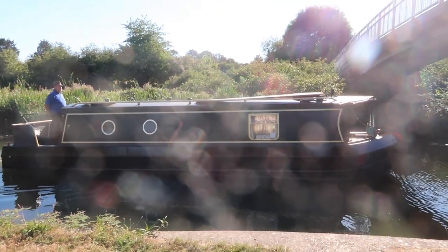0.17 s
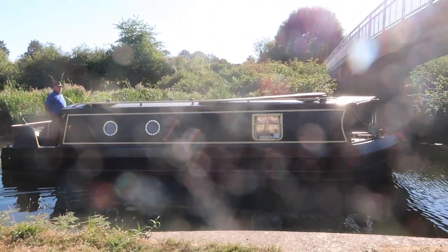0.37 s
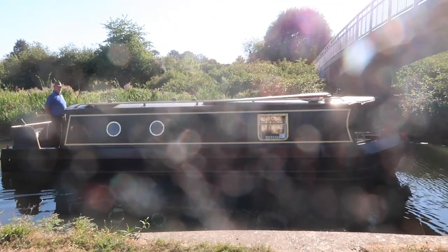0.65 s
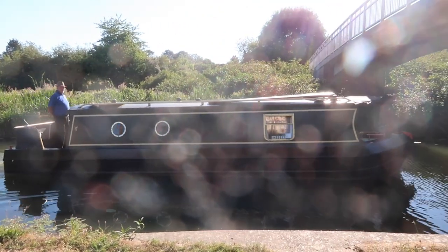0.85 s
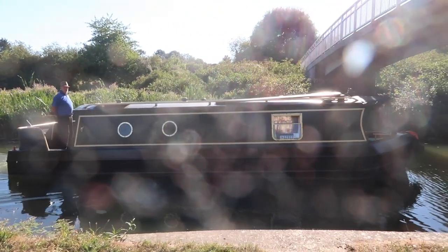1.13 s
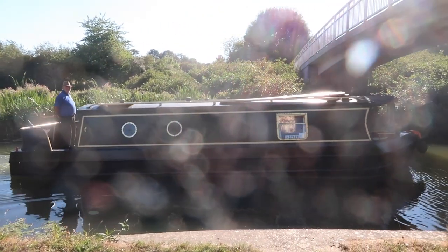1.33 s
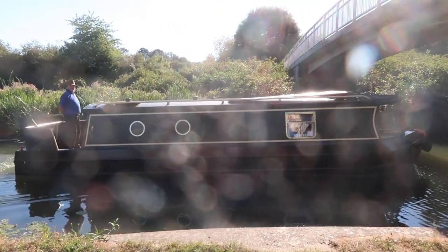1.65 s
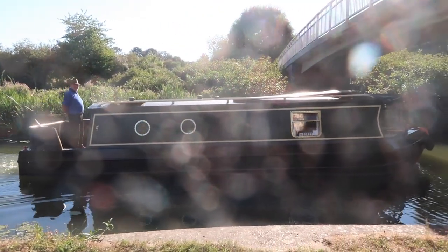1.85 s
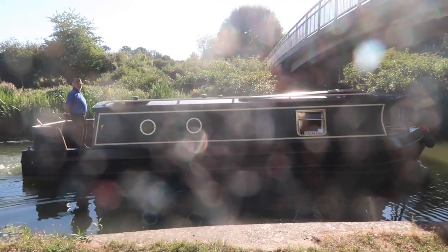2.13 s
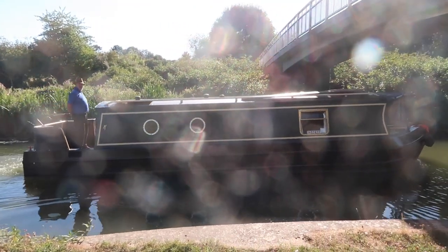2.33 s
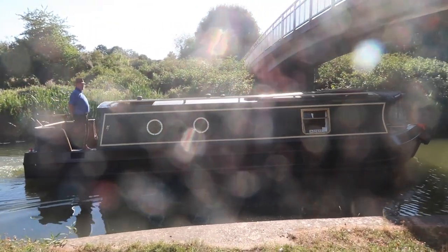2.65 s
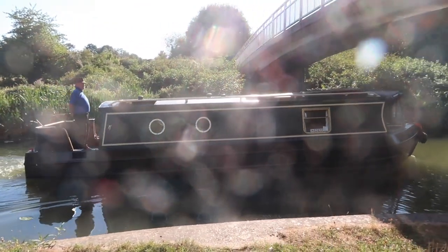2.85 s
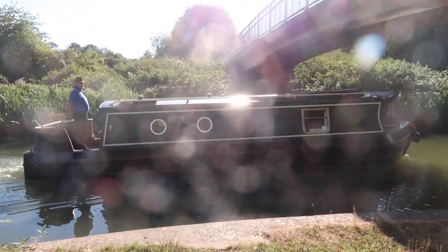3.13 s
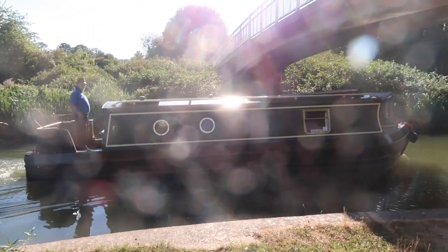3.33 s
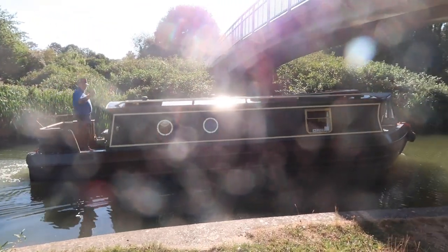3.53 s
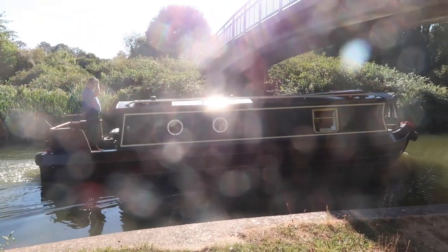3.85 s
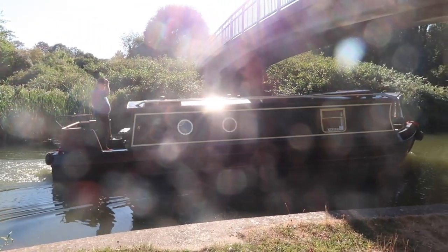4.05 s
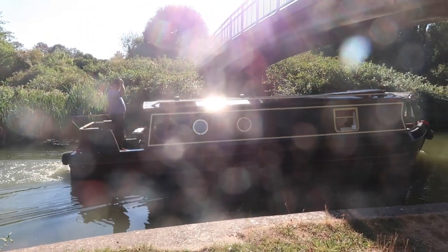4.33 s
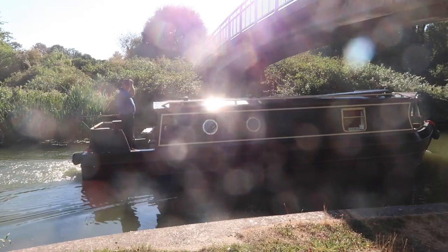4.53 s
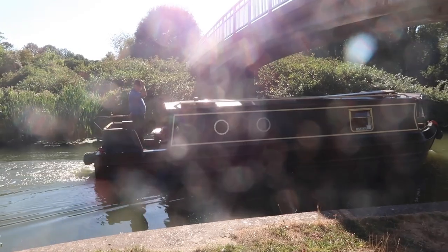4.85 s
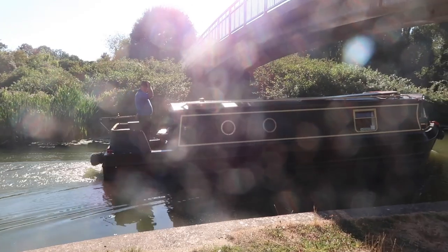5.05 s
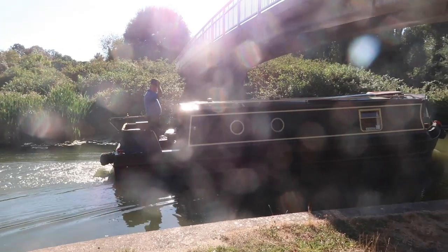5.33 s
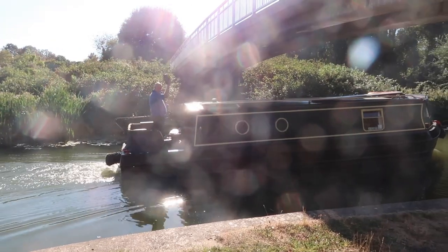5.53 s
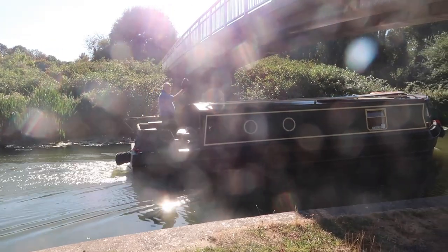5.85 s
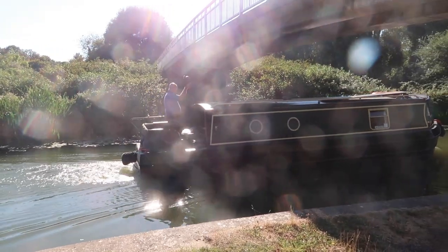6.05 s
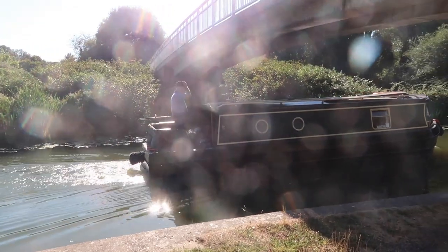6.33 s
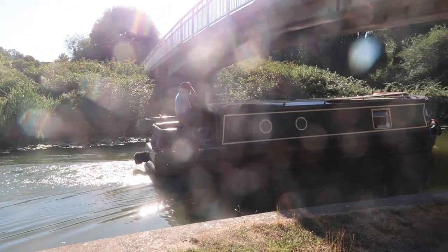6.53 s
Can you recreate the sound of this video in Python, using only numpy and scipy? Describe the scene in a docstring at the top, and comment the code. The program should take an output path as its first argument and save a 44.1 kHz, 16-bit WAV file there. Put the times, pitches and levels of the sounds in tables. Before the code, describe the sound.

A narrowboat's diesel engine chugs fast and evenly at close range, with metallic hull clatter and hissing, bubbling propeller wash growing clearer behind it.

```python
"""A narrowboat's slow four-cylinder diesel chugs past on a canal: uneven firings ring exhaust pipe and plates.
Valve gear, gears and bearings clatter through the hull, loose panels and parts answer once a cycle.
The propeller throbs low down; its wash hisses, bubbles and drips, with tappets ticking through it.
The governor hunts, and the tone changes as the boat goes from broadside to stern-on.
Behind it lie a little scatter from the banks and a faint thin whine."""
import sys
import numpy as np
from scipy import signal
from scipy.fft import rfft, irfft, next_fast_len
from scipy.io import wavfile
from scipy.ndimage import uniform_filter1d, map_coordinates

SR = 44100
rng = np.random.default_rng(int(sys.argv[2]) if len(sys.argv) > 2 else 0)


def to_wav(s):
    """Save 16-bit WAV."""
    ch = np.atleast_2d(s).T  # columns
    pcm = np.round(np.clip(ch, -1, 1) * 32767)  # PCM
    wavfile.write(sys.argv[1], SR, pcm.astype(np.int16))


N = 294588

FIRST = .621  # share of a cycle before the first cylinder fires
CYCLE_HZ, SAG_HZ_PER_S = 14.5124, .0086  # engine speed at the start without hunting, and its slow fall
HUNT_S, SURGE_AT_S = 3.245, .9975  # the governor's hunting: period, moment of the first surge
HUNT_HZ, PEAKED_HZ = .131, .028  # depth of the hunting; its second harmonic sharpens the surges
SURGE_DB = .5  # lift of clatter and wash at a surge, equal dip in a sag
TOP_HZ = 14950  # band limit of the microphone

# Exhaust pipe resonances: f/Hz, width/Hz, signed gain, then level/dB at eight moments of the swing
PIPE_MODES = [(58.15, 7.7, -0.93, -31.5, -31.5, -29.5, -30, -28.5, -29.5, -30, -30),
              (62.78, 25.1, 0.9, -28, -28.5, -29.5, -27.5, -27, -27.5, -27.5, -27.5),
              (88.84, 9.16, 0.75, -34, -28, -22.5, -22, -21, -23, -20, -19),
              (93, 22.9, -0.924, -26, -24, -23.5, -22, -22, -22, -20.5, -19.5),
              (112.42, 40.1, 0.94, -34.5, -33, -34.5, -34, -33, -33, -31, -29),
              (155.9, 35, -1.077, -42.5, -41.5, -42, -40, -40.5, -40, -38.5, -39.5),
              (201.6, 4.5, 0.66, -51.5, -39.5, -54, -47, -46, -39, -38.5, -43.5)]
# Hull plates shaken by the firings: f/Hz, width/Hz of each of two stages, signed gain,
# then level/dB at the same eight moments
PLATE_MODES = [(88, 5.5, 0.89, -32, -40, -53, -55, -60, -64, -59, -65),
               (130.1, 6.5, -0.58, -47.5, -50, -50, -49, -66, -56, -56, -55),
               (99.8, 6.5, -1.03, -55, -68, -56, -51, -38.5, -40, -58, -66),
               (99.1, 5.4, 1, -55, -46.5, -46, -60, -66, -69, -54, -41),
               (153.6, 7, 0.41, -52, -52, -56, -52, -47, -57, -46, -34.5),
               (203.2, 10, -0.83, -65, -52, -62, -52, -44, -52, -49, -45),
               (261.4, 8.6, 0.87, -65, -60, -59.5, -63.5, -59, -58.5, -48.5, -52),
               (348, 11, -0.78, -64, -75, -63, -68.5, -67, -68, -71, -79),
               (181.7, 10.1, 0.96, -61, -47.5, -44, -42.5, -63, -44, -57, -67),
               (189, 6, 1, -48, -49, -70, -50, -40, -62, -45, -44),
               (217.7, 6, -0.61, -59, -49, -43, -42.5, -47.5, -42.5, -45, -56),
               (249, 13.9, 0.96, -47.5, -48, -69, -46.5, -49.5, -51.5, -47, -50),
               (276.3, 14.2, -0.96, -58.5, -53.5, -52, -55, -59, -54.5, -67, -58.5),
               (304, 5.8, 0.86, -62, -65, -59.5, -50, -51, -61, -52.5, -63),
               (321.7, 14, -0.44, -64, -55.5, -64, -52, -50, -58, -54.5, -48),
               (364.6, 7.8, 0.87, -62.5, -67, -53.5, -60, -46.5, -50.5, -59, -68),
               (395, 8.3, -0.47, -56, -55, -58, -55, -43, -49, -55, -52),
               (424, 49, 0.74, -60.5, -65.5, -71, -67, -69, -67, -67, -60),
               (442, 27, -0.52, -60.5, -68.5, -57, -67, -58, -57.5, -65, -65),
               (482.5, 11.7, 1, -69, -51, -51, -55, -58.5, -53.5, -51, -65)]
# Spectrum of wash and tappets heard from the stern: f/Hz, relative level/dB per Hz
STERN_WASH = [(1500, -31), (3000, -4), (4300, -0.5), (5100, -3), (5400, 0.5), (5750, -5), (7000, -4.5),
              (7350, -6.5), (7570, -5), (7800, -9), (8500, -9.5), (8800, -8.5), (9300, -9), (11000, -19.5),
              (13300, -21.5), (14800, -36)]


def amp(db):
    """Decibels to linear gain."""
    return 10 ** (np.asarray(db) / 20)


def unit(x):
    """Scale to rms 1."""
    return x / np.sqrt(np.mean(x ** 2) + 1e-20)


def wobble(rate):
    """A smooth random curve, rate knots a second."""
    knots = rng.standard_normal(int(N * rate / SR) + 4)
    return map_coordinates(knots, [np.arange(N) * rate / SR])


def filtered(x, response):
    """x times a complex response of frequency."""
    m = next_fast_len(x.shape[-1] + SR // 2)
    return irfft(rfft(x, m) * response(np.fft.rfftfreq(m, 1 / SR)), m)[..., :x.shape[-1]]


def coloured(x, spectrum):
    """Shape x through (Hz, dB) points joined on a log-frequency axis, at rms 1."""
    f, db = np.transpose(spectrum)
    return unit(filtered(x, lambda hz: amp(np.interp(np.log(hz + 1), np.log(f + 1), db))))


def patchy(patchy_db, wide=5, long=10):
    """White noise with patches of random gain, wide in frequency bins and long in frames."""
    z = signal.stft(rng.standard_normal(N), nperseg=512)[2]
    field = uniform_filter1d(rng.standard_normal(z.shape), size=wide, axis=0)
    field = uniform_filter1d(field, size=long, axis=1)
    return unit(signal.istft(z * amp(patchy_db * unit(field)), nperseg=512)[1][:N])


def noise(spectrum, patchy_db):
    """Patchy noise with a given spectrum."""
    return coloured(patchy(patchy_db), spectrum)


def turning(broadside, quarter, astern):
    """Cross-fade as the boat swings away."""
    # Moments when the boat is broadside, on the quarter, astern: t/s
    aspect_s = [0.66, 3.3, 5.7]
    t = np.arange(N) / SR
    views = zip(np.eye(3), (broadside, quarter, astern))
    return sum(np.interp(t, aspect_s, share) * x for share, x in views)


def hunting():
    """Angle of the governor's swing, zero at each surge."""
    return 2 * np.pi * (np.arange(N) / SR - SURGE_AT_S) / HUNT_S


def cycles():
    """Engine cycles gone by, counted from a firing of the first cylinder."""
    speed = CYCLE_HZ - SAG_HZ_PER_S * np.arange(N) / SR
    speed = speed + HUNT_HZ * np.cos(hunting()) + PEAKED_HZ * np.cos(2 * hunting())
    return np.cumsum(speed) / SR - FIRST


def loudness(aspect_db):
    """Gain from the way the boat faces and from the engine's surges."""
    return amp(turning(*aspect_db) + SURGE_DB * np.cos(hunting()))


def beat(depth_db, quarter_cycle_db, shift):
    """Gain that swells once a cycle and, on top, four times a cycle."""
    turn = 2 * np.pi * (cycles() - shift)
    return unit(amp(depth_db * np.cos(turn) + quarter_cycle_db * np.cos(4 * turn)))


def ticks(angle, scatter_db, jitter_s, t60):
    """Parts strike at the same crank angles every cycle; each blow rings on as a fading burst of noise."""
    size_db = 1.0 * rng.standard_normal(len(angle))  # lasting differences between strikers
    turn = np.arange(-1, 98)[:, None] + angle
    chance = rng.standard_normal((2,) + turn.shape)
    at = np.interp(turn, cycles(), np.arange(N)) + jitter_s * SR * chance[0]
    at = np.clip(at, 0, N - 1).astype(int).ravel()
    inside = (at > 0) * (at < N - 1)
    blows = np.bincount(at, amp(size_db + scatter_db * chance[1]).ravel() * inside, N)
    t = np.arange(SR // 8) / SR
    tail = amp(-60 * t / t60) * rng.standard_normal(len(t))
    return unit(signal.fftconvolve(blows, tail)[:N])


def whine():
    """A faint thin tone whose phase wanders."""
    return amp(-89) * np.sin(2 * np.pi * 13012 * np.arange(N) / SR + .7 * wobble(30))


def bank_scatter():
    """Sound scattered from the banks, as steady noise in opposite polarity left and right."""
    # Scatter spectrum: f/Hz, relative level/dB per Hz
    scatter_spectrum = [(40, -33.5), (80, -14), (120, -14), (250, -5), (500, -12), (1000, -17),
                        (2000, -20.5), (3900, -27.5), (4500, -35.5), (7000, -41.5), (9500, -57.5)]
    scatter = amp(-51.5) * noise(scatter_spectrum, patchy_db=1.0)
    return np.array([scatter, -scatter])


def plink(rows):
    """Damped sines with a soft start and a rising pitch, panned."""
    s, db, hz, life, pan_db = np.transpose(rows)[:, :, None]
    t = np.arange(SR // 30) / SR
    fade = amp(db - 60 * t * hz / (3 * life))  # 20 dB down after life cycles
    tone = np.sin(2 * np.pi * hz * t * (1 + 0.062 * t * hz / life))
    wave = fade * tone * (1 - np.exp(-t * hz / 0.22))
    at = ((s * SR).astype(int) + np.arange(len(t))).ravel()
    sides = [(wave * amp(side * pan_db / 2)).ravel() for side in (1, -1)]
    return np.array([np.bincount(at, x, N + SR)[:N] for x in sides])


def drips():
    """Single drips and ticks that stand out, each a short plink."""
    # Drips: t/s, level/dB before fade and soft start, starting f/Hz, cycles to fall 20 dB,
    # left-right level/dB before the lean of the whole water
    drip_rows = [(2.845, -49.5, 8450, 14, 8), (2.901, -30.5, 950, 9.7, 0), (2.932, -27, 970, 4.6, 2.5),
                 (4.053, -34, 3120, 5.3, 2), (4.182, -32, 900, 11, 1), (4.474, -26.5, 960, 7.8, 0),
                 (4.307, -30, 910, 11, -2), (4.5835, -32, 1980, 10, -.5), (4.669, -26, 1190, 6.3, 1),
                 (4.84, -37, 1970, 12, 1), (5.092, -29, 980, 13, -3), (5.1825, -24, 4400, 4.6, -4.5),
                 (5.368, -35, 1345, 51, -2), (5.421, -40.5, 10500, 6, 5), (5.539, -35.5, 1850, 21, -1.5),
                 (5.777, -39, 970, 20, 1), (5.852, -32.5, 1810, 18, 0), (5.8885, -36, 1680, 26, -3),
                 (6.0227, -34.5, 2600, 13, -2), (6.175, -40, 4610, 6, .5), (6.272, -31, 3270, 6.4, 0),
                 (6.4523, -43, 4090, 7.3, 2), (6.538, -36, 4240, 5, 8), (3.568, -36, 940, 14, 1),
                 (5.45, -42, 4030, 6, 3), (5.22, -47, 980, 12, 2), (5.25, -47, 4100, 5.5, -11)]
    return plink(drip_rows)


def bubbles():
    """Bubbles plink at random moments; the higher ones tend to be softer."""
    u = rng.random((900, 5))
    s = u[:, 0] * N / SR
    db = -54 - 2.2 * np.log(u[:, 1]) - 9 * u[:, 2]
    hz = 700 * amp(15 * u[:, 2])
    return plink(np.c_[s, db, hz, 6 + 14 * u[:, 3], 3 * (u[:, 4] - .5)])


def tappets():
    """Tappets tick every cycle, heard with the colour of the stern and stronger as it opens."""
    # Shares of the cycle at which the tappets tick
    tappet_angles = [.0, .13, .63, .85]
    ticking = ticks(tappet_angles, scatter_db=6.0, jitter_s=.0006, t60=0.043)
    return turning(0.05, 0.1, 0.61) * coloured(ticking, STERN_WASH)


def wash():
    """Propeller wash hisses in time with the engine: a placed part with the tappets, and a wide part."""
    # Wash heard along the side: f/Hz, relative level/dB per Hz
    side_wash = [(1500, -29.5), (3000, -4), (4200, -1.5), (4600, -6), (5050, 1), (5500, -5), (6000, -1),
                 (7000, -5.5), (8500, -9), (9300, -9.5), (11000, -17), (13300, -21.5), (14800, -36.5)]
    # Wash spread wide: f/Hz, relative level/dB per Hz
    wide_wash = [(1500, -32), (3000, -13), (4300, -1), (6000, -6), (8600, -12.5), (11000, -15),
                 (13300, -30.5), (14800, -36.5)]
    # Wash level/dB broadside, on the quarter, astern
    wash_db = [-63, -63.5, -62]
    # Lag between the two microphone ports, likewise: t/s; the stern moves toward the middle
    port_lag_s = [33e-6, 24e-6, 12e-6]
    level = loudness(wash_db) * amp(0.27 * wobble(20))
    foam = patchy(1.3)
    side, astern = coloured(foam, side_wash), coloured(foam, STERN_WASH)
    stern = turning(side, (side + astern) / 2, astern) + tappets()
    lag = turning(*port_lag_s) * SR
    places = [np.arange(N) + sign * lag / 2 for sign in (1, -1)]
    ports = np.array([map_coordinates(stern, [at], order=3, mode="nearest") for at in places])
    wide = np.array([noise(wide_wash, patchy_db=3.5), noise(wide_wash, patchy_db=3.5)])
    return level * beat(0.41, .5, shift=0.62) * (amp(0.0) * ports + amp(-0.4) * wide)


def water():
    """Wash, bubbles and drips, leaning slightly to the left."""
    return (wash() + bubbles() + drips()) * amp([[.3], [-.3]])


def propeller():
    """The blades throb just under the engine's third order, so the two beat slowly."""
    # Level/dB of the blades' throb and of its sharper second beat
    blade_db = [-48.5, -46.5]
    # three blades behind the gearbox; share of a pass by which the first one is late
    blades_per_cycle, blade_lag = 2.9322, .052
    turn = 2 * np.pi * (blades_per_cycle * cycles() - blade_lag)
    return amp(blade_db[0]) * np.cos(turn) - amp(blade_db[1]) * np.cos(2 * turn)


def ringing(scatter_db=2.5, wander_db=3.0):
    """One sharp stroke a cycle sets each part ringing at its own pitch, through two resonant stages."""
    # Ringing parts: f/Hz, width/Hz of each stage, share of the cycle at the stroke,
    # then mean level/dB broadside, on the quarter, astern
    ringers = [(831, 67, .3, -59, -58, -56), (924, 37, 0.0797, -56, -55, -55.5),
               (995, 42, .2, -58.5, -58, -57.5), (2165, 63, .77, -61.5, -64.5, -70.5),
               (3030, 110, .68, -76.5, -68, -73.5)]
    total = 0
    for hz, width_hz, share, *db in ringers:
        at = np.interp(np.arange(97) + share, cycles(), np.arange(N)).astype(int)
        blows = np.bincount(at, amp(scatter_db * rng.standard_normal(len(at))), N)
        resonance = lambda f: 1j * f * width_hz / (hz * hz - f * f + 1j * f * width_hz)
        ring = unit(filtered(blows, lambda f: resonance(f) ** 2))
        total = total + amp(turning(*db) + wander_db * wobble(2.03)) * ring
    return total


def knock(at, fade_db, scatter_db=1.0):
    """Gain that jumps once a cycle, by a varying amount, and fades until the next knock."""
    turn = cycles() - at + 2
    size_db = scatter_db * rng.standard_normal(120)[turn.astype(int)]
    return unit(uniform_filter1d(amp(size_db - fade_db * (turn % 1)), size=200))


def clatter(repeat_share=0.19):
    """Rattle in the hull: a part repeats each cycle, the rest is gear and bearing noise; panels knock."""
    # Clatter through the cabin side, in between, through the stern deck: f/Hz, relative level/dB per Hz
    hull_side = [(190, -31), (330, 2.5), (402, -1), (450, -3), (489, -5), (571, -10), (731, -6.5),
                 (819, -8), (899, -8.5), (977, -8.5), (1400, -13.5), (1530, -19.5), (1600, -16.5),
                 (1830, -14), (2210, -14), (2690, -24), (3900, -27), (5070, -53), (8580, -120)]
    hull_quarter = [(190, -31), (330, 0.5), (484, 3), (565, -9), (694, -2.5), (820, -6.5), (997, -4),
                    (1260, -8.5), (1390, -9), (1550, -17), (1890, -8.5), (2530, -20), (2980, -16.5),
                    (3310, -25), (3900, -26), (5070, -51.5), (8580, -120)]
    hull_stern = [(190, -25), (330, -2), (474, -0.5), (559, -12), (687, -3.5), (890, -7), (1400, -13.5),
                  (1490, -22), (1820, -12), (2230, -22.5), (2830, -18), (3200, -27), (3550, -19),
                  (3900, -29), (5070, -62.5), (8580, -120)]
    # Panels knocked once a cycle: f/Hz, width/Hz, share of the cycle at the knock, then broadside,
    # on the quarter, astern: fade over a cycle/dB (three columns), lift/dB (three columns)
    panels = [(520, 43, .03, 1.8, 5.5, 3.5, -2.5, -1.5, 0.5), (715, 27, .9, 0.92, 1, 1, 1.5, 0, -1),
              (919, 20, 0.66, 4.4, 5.7, 5.6, 3, 1.5, 3.5), (980, 51, 0.033, 2.4, 3.4, 5, -2.5, -1, -1),
              (994, 31, 0.52, 1, 1.1, 1.1, 3.5, 4, 3.5), (1103, 30, 0.72, 4.5, 4.9, 5.1, 3, 3, 4),
              (1440, 120, 0.12, 7.8, 10, 7, 0, 3, 0.5), (1633, 32, 0.36, 4, 3.7, 3.7, 1, 2, 6),
              (1865, 99, 0.6, 3, 5, 3.2, -2.3, -0.5, 0), (2167, 24, 0.7, 6.3, 3.4, 3.2, 4.5, 4.5, 7.5),
              (2230, 130, 0.76, 15, 11, 6, 1.5, 0.5, -0.5), (2960, 240, 0.62, 4.3, 6, 9.5, 1.5, 0, 2),
              (3600, 160, .6, 2, 4.4, 11, -4, 0, 1)]
    # Clatter level/dB broadside, on the quarter, astern
    clatter_db = [-42, -41, -39.5]
    share = np.clip(repeat_share, 0, 1)
    weak_bass = lambda f: 0.27 + 0.53 / (1 + (520 / (f + 1)) ** 8)
    gears = filtered(patchy(2.05, wide=2, long=4), weak_bass)
    valve_angles = rng.random(32)  # shares of the cycle at which the valve gear strikes
    valves = ticks(valve_angles, scatter_db=2.5, jitter_s=.00006, t60=0.088)
    drive = np.sqrt(share) * valves + np.sqrt(1 - share) * gears
    hull = turning(*(coloured(drive, h) for h in (hull_side, hull_quarter, hull_stern)))
    low = filtered(hull, lambda f: 1 / (1 + (f / 1500) ** 6))
    pulsing = low * beat(0.48, 0.44, shift=0.35) + (hull - low) * beat(0.33, 0.3, shift=0.39)
    for hz, width_hz, at, *db in panels:
        panel = filtered(hull, lambda f: np.exp(-((f - hz) / width_hz) ** 2))
        gain = amp(turning(*db[3:])) * knock(at, turning(*db[:3]))
        pulsing = pulsing + panel * (gain - 1)
    return loudness(clatter_db) * pulsing


def modes(f):
    """Pipe modes behind the silencer's steep top, and sharply tuned plates; one row each."""
    ring = lambda hz, width_hz: 1j * f * width_hz / (hz * hz - f * f + 1j * f * width_hz)
    silencer = 1 / (1 + (f / 215) ** 12)
    pipe = [gain * ring(hz, width_hz) * silencer for hz, width_hz, gain, *_ in PIPE_MODES]
    plates = [gain * ring(hz, width_hz) ** 2 for hz, width_hz, gain, *_ in PLATE_MODES]
    return np.array(pipe + plates)


def exhaust(scatter_db=0.16, jitter_s=.00006, rate=14.48, wander_db=0.41):
    """One puff a firing rings pipe and plates; the note bends with engine speed, modes swell in the swing."""
    # Firing strength/dB in firing order; the second one barely fires
    cylinders_db = [1.5, -25.5, -1.5, 0]
    # Moments of the swing at which the mode levels are given: t/s
    swing_s = [0.4, 1.5, 2.4, 3.3, 3.9, 4.8, 5.7, 6.5]
    # Exhaust breath: f/Hz, relative level/dB per Hz
    breath_spectrum = [(20, -5), (35, 3), (50, -2.5), (80, -15), (140, 3.5), (200, 4), (300, -3.5),
                       (385, -6.5), (450, -24.5), (700, -52)]
    lead, step = 6, 16  # cycles already run before the start; the low note is worked out on every 16th sample
    size = step * next_fast_len((N + 2 * SR) // step, True)
    short = size // step
    # puffs at a nearly steady rate, in cycles a second
    count = np.arange(int(4 * rate * (size - SR // 2) / SR))
    chance = rng.standard_normal((len(count), 2))
    at = np.abs(count / 4 / rate + jitter_s * chance[:, 0]) * SR
    strength = amp(np.take(cylinders_db, count, mode="wrap") + scatter_db * chance[:, 1])
    puffs = np.bincount(at.astype(int), strength, size) * SR / rate
    f = np.fft.rfftfreq(short, step / SR)
    rings = irfft(rfft(puffs)[:len(f)] * modes(f), short) / step
    # where each output sample falls on the steady note: reading it there bends the pitch
    place = (cycles() + lead) / rate * SR / step
    when = np.interp(np.arange(short), place, np.arange(N) / SR)
    note = 0
    for row, ring in zip(PIPE_MODES + PLATE_MODES, rings):
        swell = np.interp(when, swing_s, amp(row[3:]))
        wander = amp(wander_db * np.resize(wobble(4)[::step], short))
        note = note + swell * wander * ring
    breath = amp(-43.5) * noise(breath_spectrum, patchy_db=2.5)
    return map_coordinates(note, [place]) + breath


def scene():
    """Engine and propeller in the middle, bank scatter and water in stereo, a faint whine."""
    ahead = exhaust() + propeller() + clatter() + ringing()
    return ahead + bank_scatter() + water() + whine()


def record(dry):
    """The microphone rolls off the deepest bass and keeps nothing above its band limit."""
    return filtered(dry, lambda hz: (1j * hz / 40 / (1 + 1j * hz / 40)) ** 2 * (hz < TOP_HZ))


dry = scene()
out = record(dry)
to_wav(out)
```